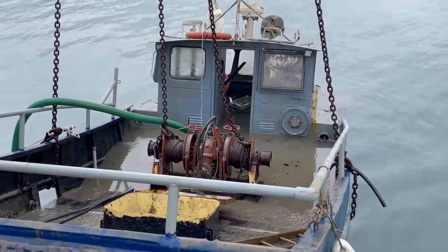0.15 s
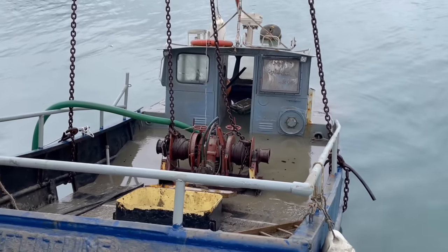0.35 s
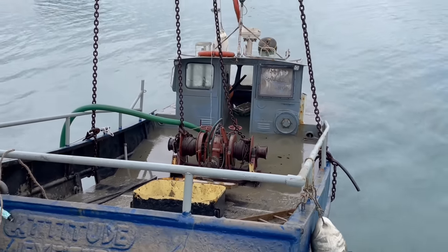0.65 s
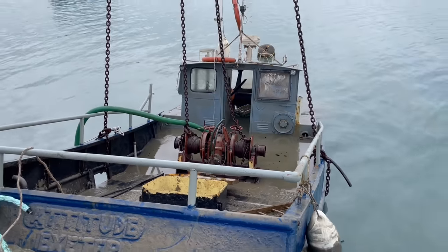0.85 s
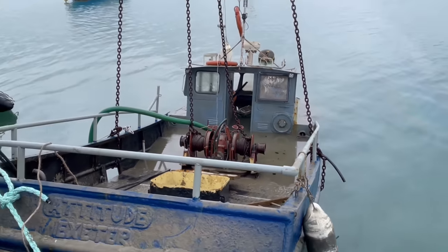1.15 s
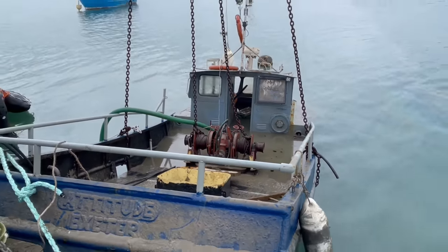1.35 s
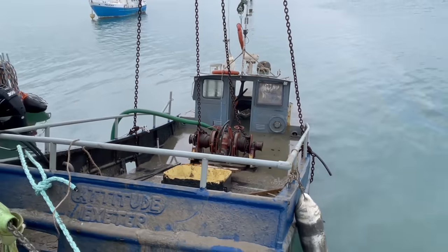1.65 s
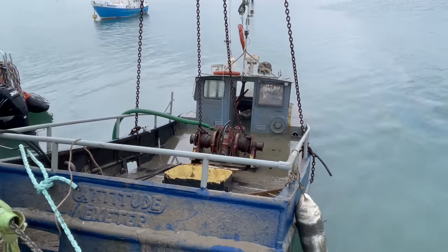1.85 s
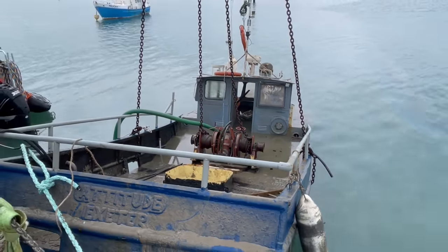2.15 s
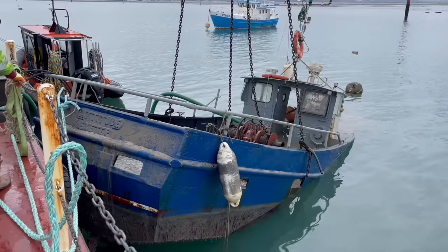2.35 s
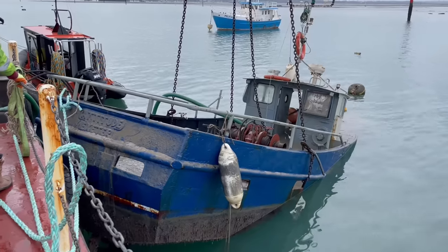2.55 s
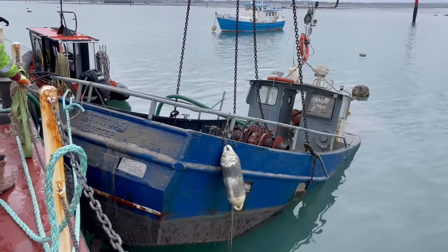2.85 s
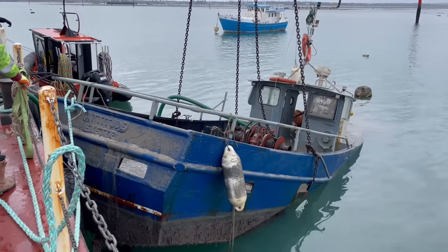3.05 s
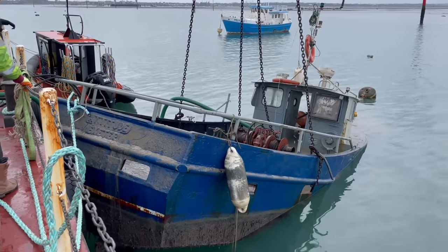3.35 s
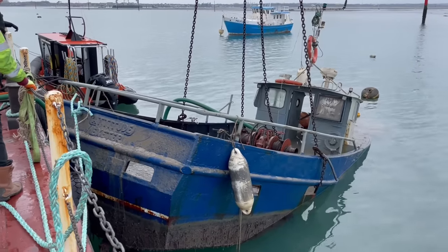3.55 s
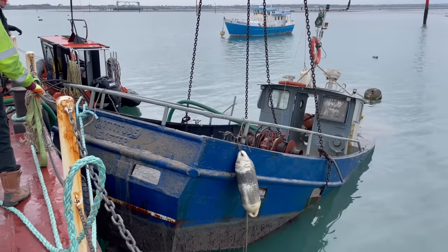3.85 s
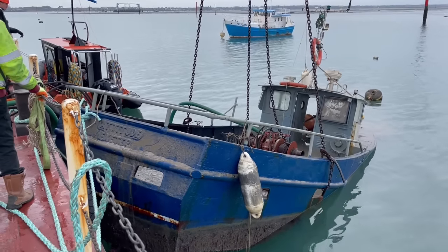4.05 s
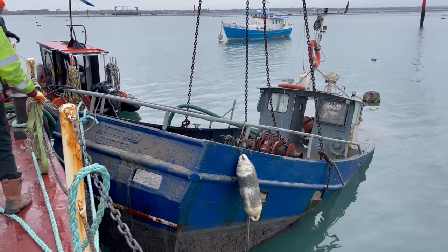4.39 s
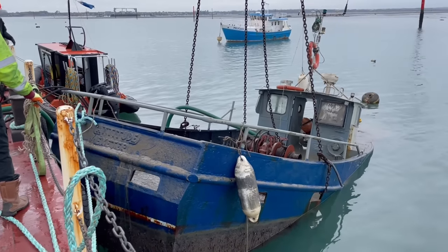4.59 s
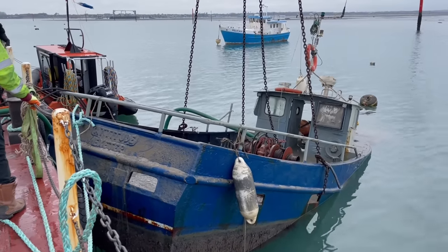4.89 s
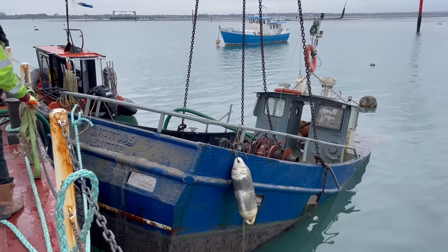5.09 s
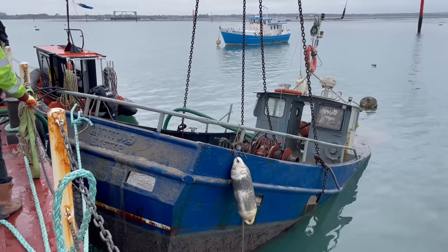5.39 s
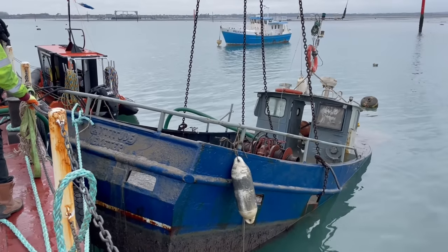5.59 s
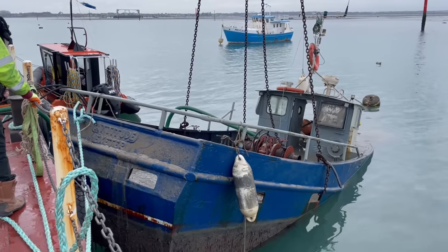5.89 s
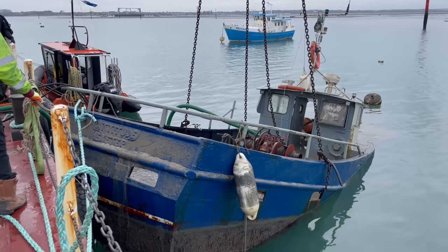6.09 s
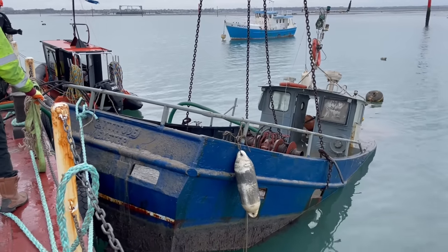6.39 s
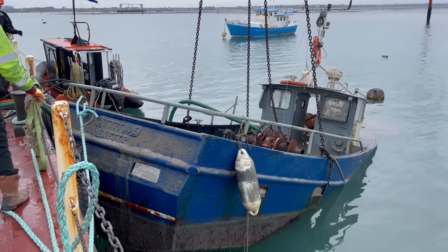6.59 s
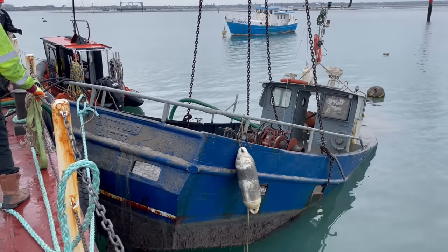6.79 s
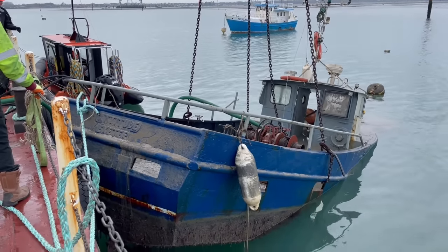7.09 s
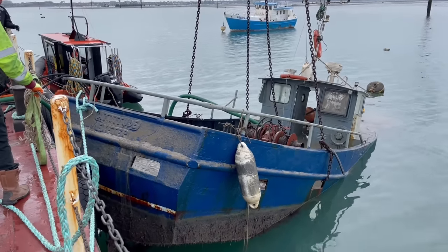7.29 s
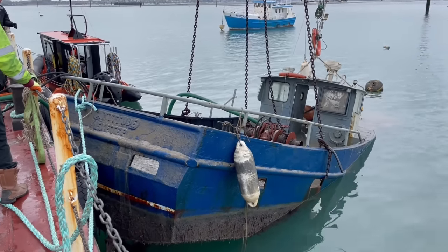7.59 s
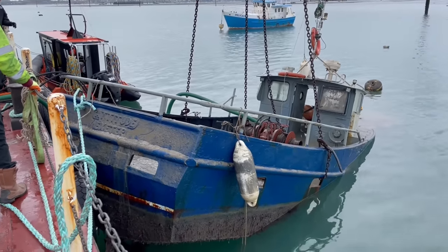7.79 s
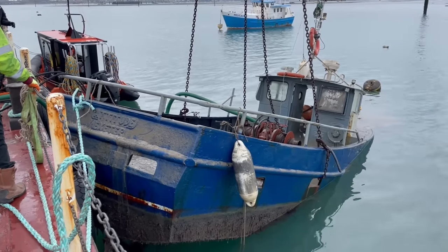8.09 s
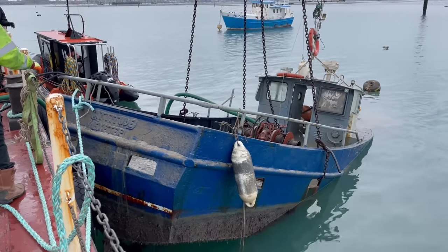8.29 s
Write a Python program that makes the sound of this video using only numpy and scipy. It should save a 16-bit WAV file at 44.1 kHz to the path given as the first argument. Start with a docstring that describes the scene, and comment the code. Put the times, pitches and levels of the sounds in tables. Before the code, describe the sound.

A small four-stroke engine driving a bilge pump runs continuously on a barge deck in an open harbour. From 0 to 2.3 s it is heard at a moderate level: a rapid, lumpy throb of three uneven thumps per cycle, about 23 cycles a second, with dry metallic clatter, thin whines and bright hiss. A few wind buffets bump the microphone, mainly in the first second and around 1.6 s. At 2.3 s there is a tiny dip and an abrupt change of position: the engine becomes louder, fuller and very slightly lower, its treble colour shifting subtly until about 4.5 s. Wind rumble strengthens, with clustered low thumps from 2.3 to 4.8 s, sparser ones through 5 to 7 s, and a strong flurry at 7.3 to 7.7 s. The engine leans left in the stereo image and keeps running to the end, about 8.4 s, without stopping.

```python
"""A small four-stroke engine throbs in three uneven thumps a cycle, over clatter, a thin whine and hiss.
It drives a bilge pump on a barge deck and is heard from two places in turn, abruptly, the second louder.
The exhaust is a sum of harmonics of the cycle rate; clatter and hiss are coloured noise that surges with it.
The whines are tones geared to the shaft. Harbour wind is gusty coloured noise, and its buffets
on the microphone are noise bursts, each with a thump that falls in pitch."""
import sys
import numpy as np
from scipy import signal
from scipy.fft import rfft, irfft
from scipy.io import wavfile
from scipy.ndimage import uniform_filter1d

SR = 44100
rng = np.random.default_rng(int(sys.argv[2]) if len(sys.argv) > 2 else 0)


def unload_wav(signal):
    """Save mono or channel-first audio to the path in sys.argv[1] as 16-bit WAV at rate SR, clipped to [-1, 1]."""
    wavfile.write(
        sys.argv[1],
        SR,
        np.round(np.clip(np.atleast_2d(signal).T, -1, 1) * 32767).astype(np.int16),
    )


N = 372204
TIME = np.arange(N) / SR
FREQ = np.fft.rfftfreq(N, 1 / SR)
CHANGE_S = 2.324  # when the listening place changes


def gain_of(db):
    """Logarithmic level: decibels to amplitude."""
    return 10 ** (np.asarray(db) / 20)


def evened(x):
    """Normalisation by mean power: scales to an rms of 1."""
    return x / np.sqrt(np.mean(x ** 2) + 1e-20)


def read(table, hz):
    """Spectral envelope: all columns of a table at hz, joined on a log-frequency axis."""
    f, *columns = np.transpose(table)
    return [np.interp(np.log(hz + 1), np.log(f + 1), c) for c in columns]


def follow(table):
    """Temporal envelope: all columns of a time curve at every sample."""
    s, *columns = np.transpose(table)
    return [np.interp(TIME, s, c) for c in columns]


def drift(rate_hz, size=2048):
    """Low-passed random process: slow movement of rms 1, up to about rate_hz."""
    hz = np.fft.rfftfreq(size, TIME[-1] / size)
    slow = irfft(rfft(rng.standard_normal(size)) * np.exp(-(hz / rate_hz) ** 2))
    return np.interp(TIME, np.linspace(0, TIME[-1], size), evened(slow))


def band_db(low_hz, high_hz, order=20):
    """Band limitation: gain of a steep band-pass in dB."""
    low_cut = 1 + (low_hz / (FREQ + 1)) ** order
    high_cut = 1 + (FREQ / high_hz) ** order
    return -10 * np.log10(low_cut * high_cut)


def count_cycles(speed, start_cycles):
    """Phase as the integral of speed: a four-stroke cycle takes two turns; the count wanders a little."""
    steady = np.cumsum(follow(speed)[0]) / (2 * 60 * SR)
    return steady - start_cycles + 0.002 * drift(3)


def mean_rate(cycles):
    """Mean frequency: cycles a second over the whole duration."""
    return (cycles[-1] - cycles[0]) / TIME[-1]


# Exhaust harmonics. Each row: multiple of the cycle rate, mean level in dB at the first place,
# mean level in dB at the second.
EXHAUST_ORDERS = [(2, -73.6, -74.0), (3, -67.4, -73.1), (4, -81.3, -77.5), (5, -65.1, -66.6),
                  (6, -64.1, -62.0), (7, -70.8, -61.3), (8, -59.4, -52.8), (9, -66.3, -64.1),
                  (10, -58.4, -58.0), (11, -63.2, -56.8), (12, -77.8, -75.8), (13, -64.7, -60.6),
                  (14, -66.5, -62.4), (15, -68.2, -60.2), (16, -75.8, -74.3), (17, -83.6, -74.0),
                  (18, -82.6, -75.6), (19, -95.5, -78.2), (20, -78.3, -82.6), (21, -80.8, -77.3),
                  (22, -76.5, -90.1), (23, -81.5, -83.4), (24, -65.8, -66.6), (25, -78.6, -91.2),
                  (26, -82.0, -80.9), (29, -89, -88), (31, -85.5, -95), (32, -86.5, -77.3),
                  (35, -87, -88.5), (38, -83, -81.5), (39, -83, -98), (40, -83, -83.5), (41, -88, -82),
                  (43, -98, -86), (44, -88, -79.3), (46, -97, -86), (47, -87.5, -86.5), (48, -82.5, -86),
                  (51, -90, -87), (53, -86, -94), (54, -100, -83.5)]
# Exhaust puffs of one cycle, which also time the knocks of the clatter.
# Each row: moment as a share of the cycle, relative strength.
EXHAUST_PUFFS = [(0, 1.153), (0.25, 0.52), (.671, 1.297)]
SILENCER_HZ, SILENCER_Q = 153, 1.55


def exhaust(cycles, place, lead_rad, left_db, uneven, fullness_db, wander_db=1.0, sway_rad=0.16):
    """Fourier synthesis: puffs and silencer resonance set the phases, so harmonics bunch into three thumps."""
    at, strength = np.transpose(EXHAUST_PUFFS)
    multiples, *levels_db = np.transpose(EXHAUST_ORDERS)
    tilt_db = fullness_db * drift(25)  # a full puff is darker, a lean one brighter
    out = np.zeros((2, N))
    for k, db in zip(multiples, levels_db[place]):
        hz = k * mean_rate(cycles)
        detuning = hz / SILENCER_HZ - SILENCER_HZ / hz
        silencer = -1 / (1 + 1j * SILENCER_Q * detuning) ** 2
        puffs = np.sum(strength * np.exp(-2j * np.pi * k * at))
        wander = drift(2.55)  # moving air makes each harmonic waver in level and pitch
        level_db = db + wander_db * wander + tilt_db * np.tanh(np.log2(hz / 230))
        angle = 2 * np.pi * k * cycles + np.angle(silencer * puffs) + sway_rad * wander[::-1]
        # the engine stands to the left: higher harmonics reach that port earlier and louder
        side_db, side_rad = left_db * hz / 500, lead_rad * hz / 500
        balance = evened(gain_of([side_db / 2, -side_db / 2]))[:, None]
        tone = np.cos([angle + side_rad / 2, angle - side_rad / 2])
        out += balance * np.sqrt(2) * gain_of(level_db) * tone
    return out * (1 + uneven * drift(41))


def ports(white, db, pair):
    """Interaural coherence: colours two white signals into what the left and right microphone ports pick up."""
    balance_db, likeness, lead_rad = read(pair, FREQ)
    a, b = rfft(white)
    left = a * gain_of(balance_db / 2)
    mixed = likeness * a + np.sqrt(1 - likeness ** 2) * b
    right = mixed * gain_of(-balance_db / 2) * np.exp(-1j * lead_rad)
    return irfft(np.array([left, right]) * gain_of(db) * np.sqrt(SR / 2), N)


def deck_ripple(depth_db, count=24):
    """Comb filtering: echoes off the steel deck, 2 to 20 ms late, ripple the spectrum by depth_db rms."""
    delay, turn = rng.random((2, count, 1))
    hz = np.arange(0, SR / 2, 5)
    delay_s = 0.002 + 0.018 * delay
    comb = np.cos(2 * np.pi * (hz * delay_s + turn)).sum(0)
    return depth_db * np.interp(FREQ, hz, evened(comb))


# Clatter spectrum before the deck ripple. Each row: frequency in Hz, density in dB per Hz at the first place,
# density in dB per Hz at the second.
CLATTER_COLOUR = [(430, -95.5, -95), (770, -99, -97.5), (970, -101, -96), (1225, -100.6, -97),
                  (1427, -105.8, -103.2), (1670, -109, -103.5), (1990, -109.5, -105),
                  (2210, -104.5, -104.5), (2570, -110.9, -103.8), (3130, -110.6, -108.6),
                  (3840, -109.4, -106.5), (3960, -110, -108), (4260, -115.6, -106), (4920, -114, -111),
                  (5200, -113.5, -109)]
# Clatter at the two microphone ports, one table for each place.
# Each row: frequency in Hz, left minus right in dB, likeness from 0 to 1, left lead in rad.
CLATTER_PORTS = [[(450, 2, 0.67, 0.1), (700, 6, 0.67, 1.5), (950, 6, 0.67, 1.7), (1230, 4, 0.72, 1.4),
                  (1480, 3, 0.62, 0.2), (1850, 1, 0.88, -0.0), (2250, 0, 0.98, 0.0), (2700, 0, 0.92, 0.2),
                  (3100, 0, 0.86, 0.5), (3700, 0, 0.87, 0.6), (4400, 0, 0.84, 0.2), (5250, 0, 0.82, 0.3)], [(450, 2, 0.41, -0.2), (700, 5, 0.56, 1.7), (950, 9, 0.55, 2.5),
                                       (1230, 6, 0.84, 2.4), (1480, 2, 0.45, 4.0), (1850, 1, 0.64, 5.2),
                                       (2250, -1, 0.89, 6.1), (2700, 1, 0.7, 7.5), (3100, 4, 0.33, 8.2),
                                       (3700, 6, 0.62, 6.4), (4400, 4, 0.69, 7.0), (5250, 5, 0.35, 7.6)]]
# Part of the clatter that repeats alike in every cycle. Each row: frequency in Hz, share of power from 0 to 1.
REPEATING_SHARE = [(400, 0.09), (1250, 0.1), (1500, 0.43), (2600, 0.23), (4000, 0)]
# How openly the hand-held microphone faces the clatter; the whines follow it twice as far in dB.
# Each row: time in seconds, gain in dB.
MICROPHONE_EXPOSURE = [(0, -0.3), (1.2, -0.2), (2.3, -0.5), (2.9, -1), (3.8, -0.5), (4.8, -0.5), (6, -1.5),
                       (7.1, -1.5), (8.44, -1.3)]


def clatter(cycles, place, knock_depth, swell_depth, swell_at, size=4096):
    """Cyclostationary noise: valve gear and casing repeat a pattern plus fresh rattle, surging with the strokes."""
    cycle_hz = mean_rate(cycles)
    share = np.clip(read(REPEATING_SHARE, cycle_hz * np.arange(size // 2 + 1))[0], 0, 1)
    phases = np.exp(2j * np.pi * rng.random((2, len(share))))
    patterns = irfft(np.sqrt(share * cycle_hz / SR) * size * phases)
    pattern_at = np.arange(size) / size
    repeating = np.array([np.interp(cycles, pattern_at, p, period=1) for p in patterns])
    fresh_share = 1 - np.clip(read(REPEATING_SHARE, FREQ)[0], 0, 1)
    fresh = irfft(rfft(rng.standard_normal((2, N))) * np.sqrt(fresh_share), N)
    knocks = sum(strength * np.exp((np.cos(2 * np.pi * (cycles - at)) - 1) / 0.051)
                 for at, strength in EXHAUST_PUFFS)
    swell = swell_depth * np.cos(2 * np.pi * (cycles - swell_at))
    surge = evened(1 + knock_depth * knocks + swell)
    colour_db = read(CLATTER_COLOUR, FREQ)[place] + band_db(380, 5500) + deck_ripple(depth_db=1.5)
    level_db = follow(MICROPHONE_EXPOSURE)[0] + 0.45 * drift(18)
    return gain_of(level_db) * ports((repeating + fresh) * surge, colour_db, CLATTER_PORTS[place])


# Hiss spectrum before the deck ripple. Each row: frequency in Hz, density in dB per Hz at the first place,
# density in dB per Hz at the second.
HISS_COLOUR = [(5700, -115.8, -115.6), (6600, -112.7, -116.9), (7600, -114.7, -113.9),
               (8400, -116.0, -113.4), (9500, -115.4, -110.6), (11000, -117.4, -112.5),
               (12200, -115.9, -113.4), (13100, -113.4, -111.8), (14200, -117.6, -116.0),
               (15400, -124.3, -121.1)]
# Hiss at the two microphone ports.
# Each row: frequency in Hz, left minus right in dB, likeness from 0 to 1, left lead in rad.
HISS_PORTS = [(5700, 0, 0.43, -1.1), (6700, 0, 0.6, -0.8), (7600, 0, 0.83, -2.6), (8400, 0, 0.92, -3.1),
              (9500, 0, 0.81, -3.6), (11000, 0, 0.67, -4.7), (12200, 0, 0.71, -5.5), (13100, 0, 0.96, -6.3)]


def hiss(cycles, place, swell_at, swell_depth=0.11):
    """Amplitude-modulated noise: bright hiss that swells a little once a cycle."""
    surge = 1 + swell_depth * np.cos(2 * np.pi * (cycles - swell_at))
    colour_db = read(HISS_COLOUR, FREQ)[place] + band_db(6070, SR / 2) + deck_ripple(depth_db=0.7)
    return ports(rng.standard_normal((2, N)) * surge, colour_db, HISS_PORTS)


# Whines geared to the shaft. Each row: multiple of the cycle rate, flutter rate in Hz,
# level in dB at the first place before exposure, the same at the second.
SHAFT_WHINES = [(75, 8, -110, -93), (94, 4, -92, -105), (96, 5, -91, -78.2), (168, 40, -97, -100),
                (235, 70, -101, -92), (562, 50, -94, -115)]


def whine(cycles, place, swing_rad=1.1):
    """Phase modulation: the shaft speeds up and slows once a cycle; the tones beam, so fade fast off axis."""
    swing = swing_rad * np.sin(2 * np.pi * cycles)
    out = np.zeros(N)
    for multiple, flutter_hz, *levels_db in SHAFT_WHINES:
        flutter = drift(flutter_hz) + 1j * drift(flutter_hz)
        strength = 1 + multiple / 280 * flutter  # higher whines flutter more deeply
        tone = strength * np.exp(1j * (2 * np.pi * multiple * cycles + swing))
        out += gain_of(levels_db[place]) * evened(tone.real)
    return out * gain_of(2 * follow(MICROPHONE_EXPOSURE)[0])


# Engine speed at the first place. Each row: time in seconds, revolutions a minute.
FIRST_SPEED = [(0.0, 2790), (2.33, 2783)]


def first_place():
    """Superposition of the engine's sources at the quieter place."""
    cycles = count_cycles(FIRST_SPEED, 0.815)
    note = exhaust(cycles, 0, lead_rad=0.88, left_db=5.5, uneven=0.06, fullness_db=0.5)
    rattle = clatter(cycles, 0, knock_depth=0.24, swell_depth=0.1, swell_at=0.45)
    return note + rattle + hiss(cycles, 0, swell_at=0.54) + whine(cycles, 0)


def eddies(colour, apart):
    """Turbulent pressure noise: one colour at even strength, partly different at the two ports."""
    shared, own = irfft(rfft(rng.standard_normal((2, N))) * gain_of(read(colour, FREQ)[0]), N)
    power = uniform_filter1d(uniform_filter1d(shared ** 2, size=1800), size=1800)
    return shared / np.sqrt(power) + apart * evened(own) * np.array([[1], [-1]])


# Colours of the wind, low to high; flutter and ruffle also colour the buffets.
# Each row: frequency in Hz, relative density in dB.
RUMBLE_COLOUR = [(15, -30), (28, -4), (40, 10.5), (54, 19), (75, 10), (110, 7.5), (150, -16), (260, -76)]
FLUTTER_COLOUR = [(25, -26), (70, -2.5), (125, 4), (200, -1), (320, -4.5), (430, -13), (650, -30),
                  (1200, -84)]
RUFFLE_COLOUR = [(220, -30), (380, 8), (560, 8), (850, -1), (1300, -13), (2500, -57)]
# Strength of the breeze on the microphone between buffets.
# Each row: time in seconds, level in dB before the offset of each layer.
BREEZE_STRENGTH = [(0.0, -61), (0.55, -65), (0.8, -61), (1.1, -64), (1.4, -68), (1.65, -61.5),
                   (2.08, -66.5), (2.45, -59), (2.7, -56.8), (3.3, -59.5), (3.9, -57), (4.2, -59),
                   (4.55, -56.5), (4.8, -58.5), (5.45, -57), (5.8, -61), (6.25, -56), (6.6, -59),
                   (7.25, -58), (7.52, -55), (7.75, -59), (8.0, -57), (8.35, -61.5)]


def wind(rumble_db=-1.3, flutter_db=-1, ruffle_db=-76, brighten=1.37, gusty_db=2.4, flicker_db=1.15, gust_hz=9):
    """Turbulence spectrum: random gusts rumble and flutter; the harder it blows, the higher that reaches."""
    breeze_db = follow(BREEZE_STRENGTH)[0]
    stirred_db = breeze_db + flicker_db * drift(gust_hz)
    rumble_level_db = breeze_db + rumble_db + gusty_db * drift(gust_hz)
    ruffle_level_db = ruffle_db + brighten * (stirred_db - breeze_db.mean())  # brighten: dB per dB of breeze
    rumble = gain_of(rumble_level_db) * eddies(RUMBLE_COLOUR, apart=0.49)
    flutter = gain_of(stirred_db + flutter_db) * eddies(FLUTTER_COLOUR, apart=0.69)
    ruffle = gain_of(ruffle_level_db) * eddies(RUFFLE_COLOUR, apart=0.98)
    return rumble + flutter + ruffle


def burst(noise, shape):
    """Windowed noise: cuts a burst out of two-port noise, with an rms of 1 at its crest."""
    cut = noise * shape
    return cut * np.sqrt(np.sum(shape ** 2) / np.sum(cut.mean(0) ** 2))


# Colour of the hollow body of a buffet. Each row: frequency in Hz, relative density in dB.
BODY_COLOUR = [(50, -20), (130, 5), (220, 2.5), (380, -1), (600, -21.5), (1400, -80)]
# Buffets of wind. Each row: crest of the ruffle in seconds, length in seconds, ruffle in dB, body in dB,
# thump in dB, pitch at the crest of the thump in Hz.
WIND_BUFFETS = [(0.068, 0.012, -60, -50, -48, 68), (0.226, 0.0093, -65, -50.5, -50, 76),
                (0.304, .016, -76, -57, -47.5, 70.4), (0.712, 0.021, -63, -49.5, -48, 75.4),
                (0.808, .01, -68, -51.5, -52, 72), (0.857, .01, -75, -56, -55, 80),
                (1.468, .01, -78, -57, -55, 60), (1.604, 0.017, -80, -58, -57, 70),
                (1.755, .013, -65, -50.5, -45.5, 70.5), (2.249, .016, -63, -53.5, -47, 88),
                (2.345, .012, -78, -53, -50, 125), (2.405, 0.018, -62, -51, -48.5, 72),
                (2.475, 0.016, -68, -53, -47.5, 60), (2.516, .012, -62, -50, -51, 72),
                (2.568, .012, -66, -52, -51, 68), (2.636, .013, -66, -48.5, -48, 115),
                (2.743, 0.016, -66, -49.5, -54, 88), (2.854, .014, -76, -53, -46.5, 78),
                (2.904, .014, -76, -51, -50, 100), (2.959, .012, -72, -52, -55, 110),
                (3.108, .012, -65, -53, -57, 90), (3.48, .018, -76, -52, -50, 72),
                (3.584, .014, -58, -49, -51, 85), (3.622, .018, -60, -48, -43.5, 67.8),
                (3.698, 0.015, -76, -57, -52, 68), (3.819, .01, -69, -48, -54, 95),
                (3.868, .018, -72, -54, -44, 72), (3.94, .014, -57, -46.5, -44, 88),
                (3.961, .01, -68, -56, -48, 74), (4.135, 0.021, -58.5, -50, -43.5, 72),
                (4.338, 0.014, -72, -48.5, -41, 70), (4.396, .01, -78, -57, -48, 70),
                (4.525, .018, -62, -52, -49, 86), (4.59, 0.02, -69, -49, -43, 82.4),
                (4.648, .014, -78, -56, -49, 60), (4.74, .012, -76, -58, -51, 66),
                (5.08, .014, -80, -56, -51, 70), (5.675, .011, -61, -51.5, -47, 72.2),
                (6.30, .018, -76, -56, -51, 70), (6.43, .014, -73, -54, -49.5, 86),
                (6.611, .014, -67, -52, -50, 90), (6.779, .013, -74, -53, -47, 74),
                (6.912, .016, -73, -57, -46, 62), (7.122, 0.013, -77, -53, -49, 88),
                (7.235, .014, -68, -49, -56, 89), (7.342, .012, -55.5, -48, -40.5, 66),
                (7.424, .018, -72, -52, -46, 78), (7.478, .016, -63, -50, -42, 58),
                (7.508, 0.016, -56, -48, -49, 100), (7.537, .01, -59, -48, -53, 110),
                (7.572, .01, -68, -49, -52, 125), (7.609, .013, -54, -45, -45, 87),
                (7.675, .014, -72, -54, -53, 80), (7.811, .012, -64, -51, -45, 62),
                (8.099, .014, -72, -53, -45.5, 72.2), (8.21, .012, -80, -58, -53, 70)]


def buffets(thump_s=0.018, lag_s=0.01197, fall_s=0.0499, wake_db=-11, wake_rise_s=0.023, wake_s=0.043):
    """Eddy impact: a ruffle with a hollow body, then a push that falls in pitch and a rumbling wake."""
    ruffle = eddies(RUFFLE_COLOUR, apart=0.76)
    body = eddies(BODY_COLOUR, apart=0.34)
    wake = eddies(FLUTTER_COLOUR, apart=0.5)
    out = np.zeros((2, N))
    turns = rng.random(len(WIND_BUFFETS))
    for (s, length_s, ruffle_db, body_db, thump_db, hz), turn in zip(WIND_BUFFETS, turns):
        near = abs(TIME - s) < 0.15
        t = TIME[near] - s
        late = t - lag_s
        falling = turn - hz * fall_s * np.exp(-late / fall_s)  # phase in turns
        push = np.cos(2 * np.pi * falling) * np.exp(-(late / thump_s) ** 2)
        wake_shape = np.exp(-abs(t) / np.where(t < 0, wake_rise_s, wake_s))
        out[:, near] += gain_of(ruffle_db) * burst(ruffle[:, near], np.exp(-abs(t) / length_s))
        out[:, near] += gain_of(body_db) * burst(body[:, near], np.exp(-(t / length_s) ** 2))
        out[:, near] += gain_of(thump_db) * push
        out[:, near] += gain_of(thump_db + wake_db) * burst(wake[:, near], wake_shape)
    return out


# Resonances and hollows of the treble that slide as the microphone moves.
# Each row: width in Hz, then a curve of points: time in seconds, centre in Hz, lift in dB.
SLIDING_RESONANCES = [(220, [(2.33, 2850, 1.5), (3.3, 2700, 2.5), (4.2, 2620, 2.7), (4.9, 2600, .5),
                      (8.44, 2550, 0.5)]), (250, [(2.33, 3580, -2.5), (3.5, 3480, -3.5), (3.8, 3150, -2.5),
                      (4.6, 3100, -1), (8.44, 3050, -1)]), (229, [(2.33, 4300, 0), (3.0, 4270, 3),
                      (3.55, 4150, 3), (3.8, 3880, 1.5), (6, 3650, 1), (8.44, 3600, -1.5)]),
                      (180, [(2.33, 5650, -2), (3.55, 5500, -5), (3.8, 4800, -4), (4.5, 4850, -1),
                      (8.44, 4900, 1)]), (130, [(2.33, 5050, 2), (3.55, 4900, 2), (3.8, 5270, 0.5),
                      (8.44, 5350, 2.5)]), (450, [(2.33, 6700, 3.5), (3.0, 6400, 5), (3.6, 6200, 3),
                      (3.72, 6100, -2), (8.44, 5900, -2)])]


def slide(sound, size=512):
    """Time-varying filtering: lifts and hollows the treble along the sliding resonances."""
    hz, t, z = signal.stft(sound, SR, nperseg=size)
    lift_db = np.zeros(z.shape[1:])
    for width_hz, curve in SLIDING_RESONANCES:
        s, centre_hz, db = np.transpose(curve)
        offset_hz = hz[:, None] - np.interp(t, s, centre_hz)
        lift_db += np.interp(t, s, db) * np.exp(-(offset_hz / width_hz) ** 2)
    return signal.istft(z * gain_of(lift_db), SR, nperseg=size)[1][:, :N]


# Engine speed at the second place. Each row: time in seconds, revolutions a minute.
SECOND_SPEED = [(2.33, 2740), (2.71, 2749), (3.09, 2730), (3.47, 2739), (3.85, 2741), (4.24, 2725),
                (4.62, 2736), (5.38, 2745), (6.15, 2726), (6.53, 2733), (8.44, 2735)]


def second_place():
    """Superposition of the engine's sources at the louder place, with sliding treble."""
    cycles = count_cycles(SECOND_SPEED, 0.488)
    note = exhaust(cycles, 1, lead_rad=0.84, left_db=4.0, uneven=0.09, fullness_db=1.1)
    rattle = clatter(cycles, 1, knock_depth=0.13, swell_depth=0.18, swell_at=0.29)
    treble = slide(rattle + hiss(cycles, 1, swell_at=0.23))
    return note + treble + whine(cycles, 1)


def scene(dip_db=-20, dip_s=0.011, recover_s=0.003):
    """Superposition: one place, then the other, under wind; the level dips briefly at the change."""
    engine = np.where(TIME < CHANGE_S, first_place(), second_place())
    dip = np.exp(-((TIME - CHANGE_S) / np.where(TIME < CHANGE_S, dip_s, recover_s)) ** 2)
    return (engine + wind() + buffets()) * gain_of(dip_db * dip)


def record(dry, low_cut_hz=29, edge_hz=15700):
    """Linear filtering: the recorder's wind filter and upper band limit."""
    dry = irfft(rfft(dry) * gain_of(band_db(low_cut_hz, SR, order=12)), N)
    low_pass = signal.firwin(511, edge_hz, window=("kaiser", 9), fs=SR)
    return signal.oaconvolve(dry, low_pass[None], "same")


dry = scene()
out = record(dry)
unload_wav(out)
```